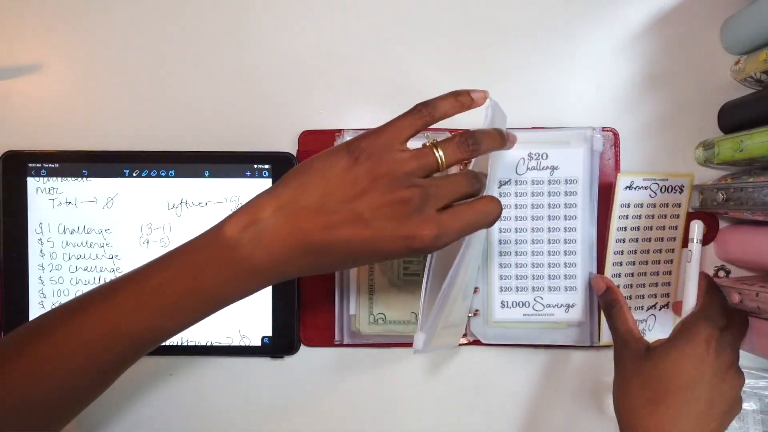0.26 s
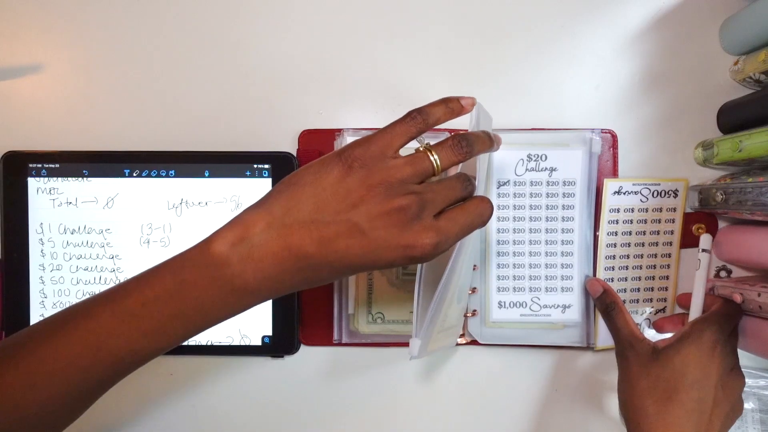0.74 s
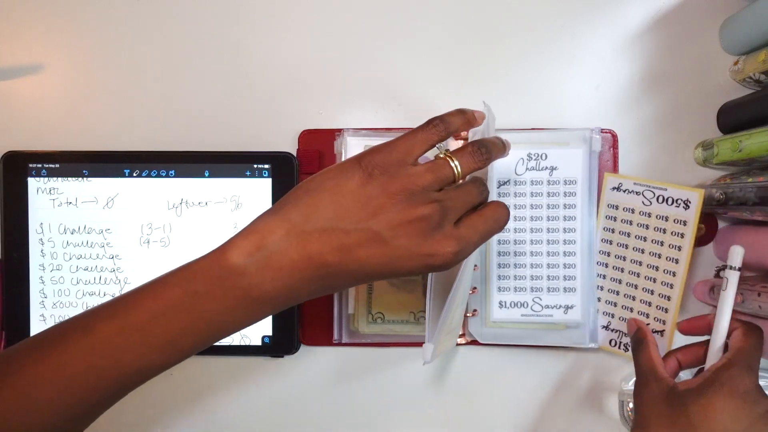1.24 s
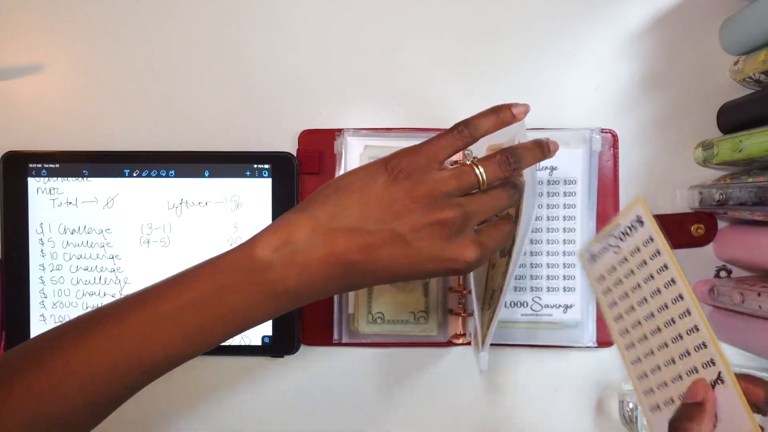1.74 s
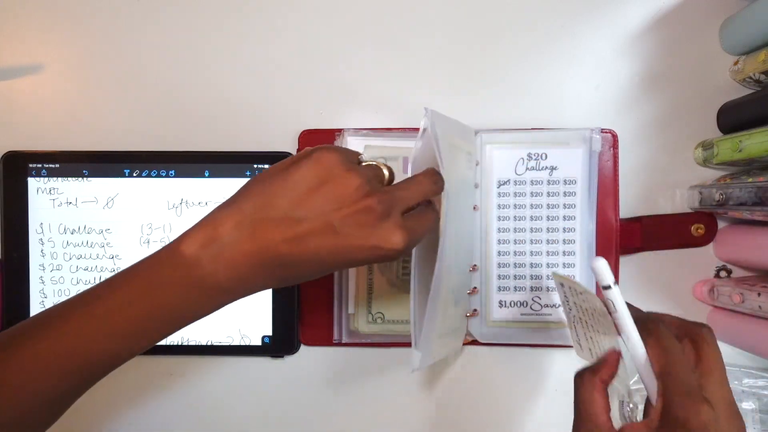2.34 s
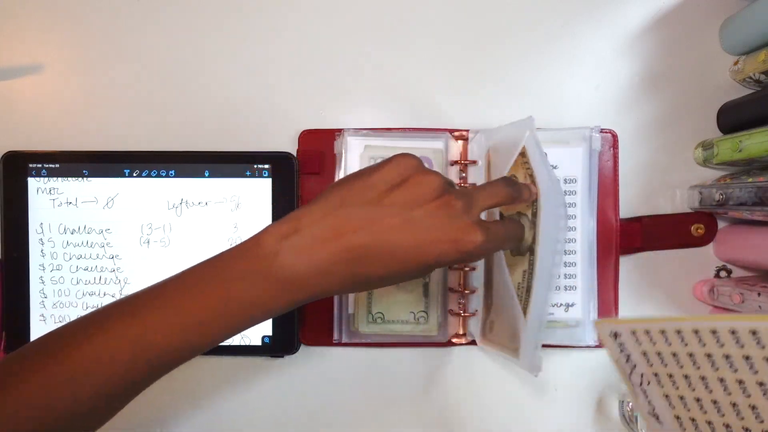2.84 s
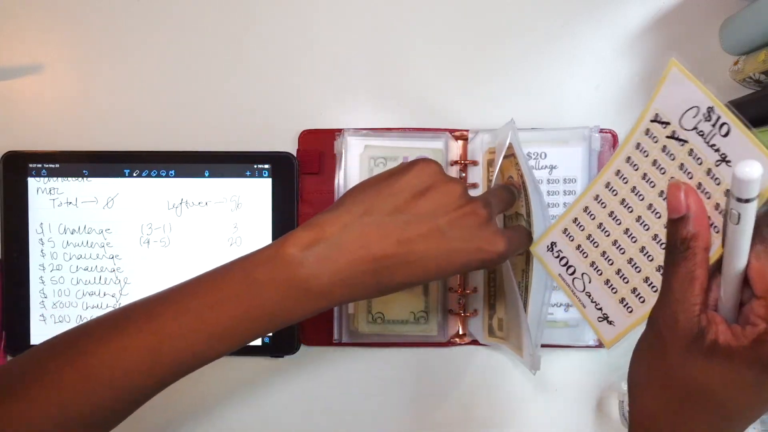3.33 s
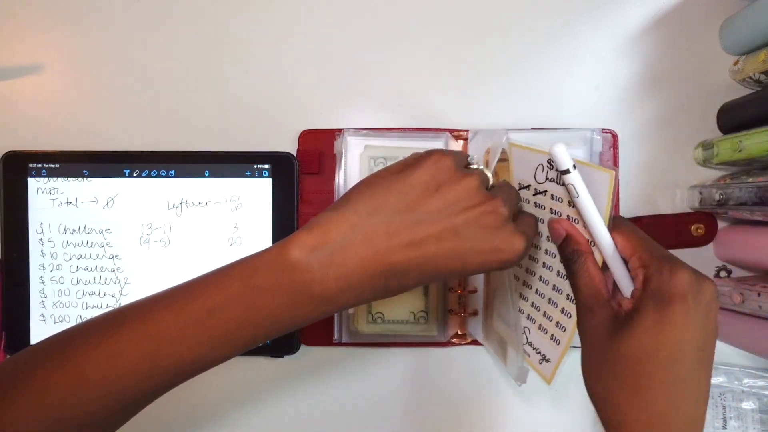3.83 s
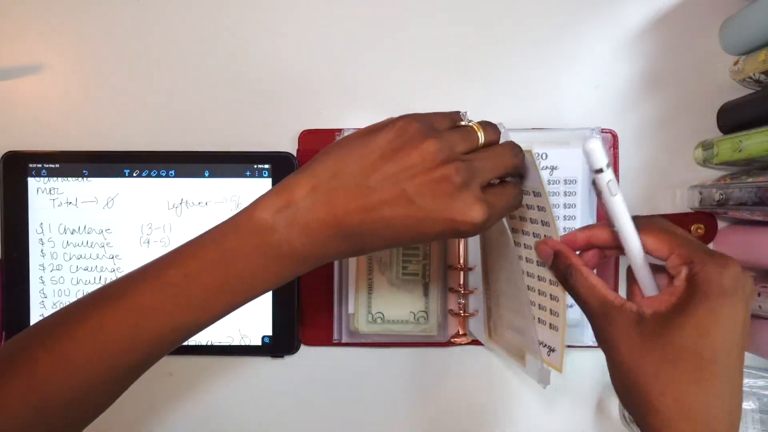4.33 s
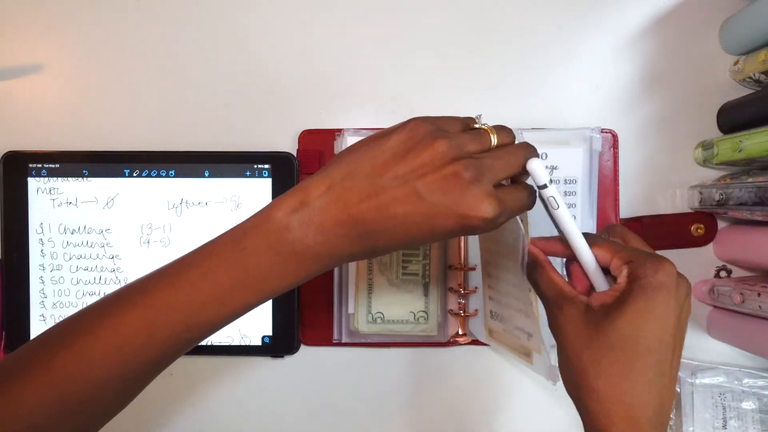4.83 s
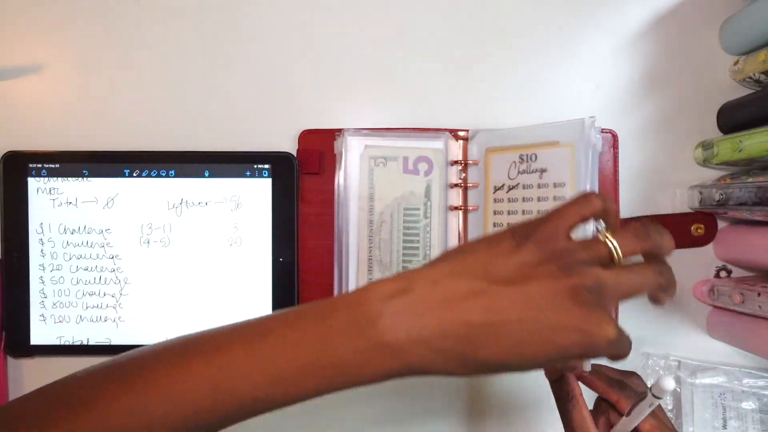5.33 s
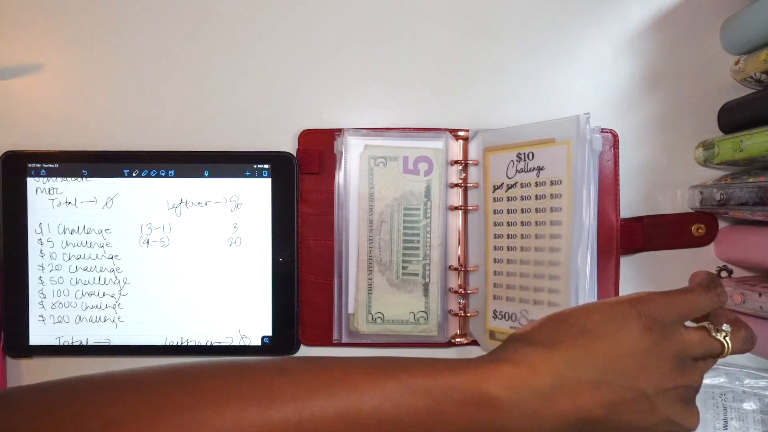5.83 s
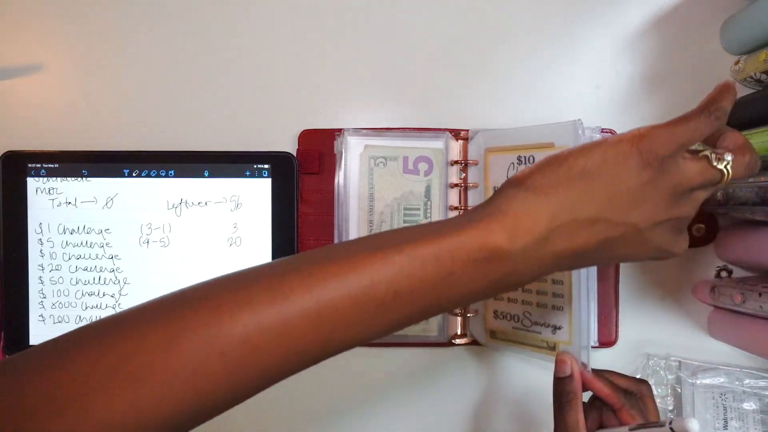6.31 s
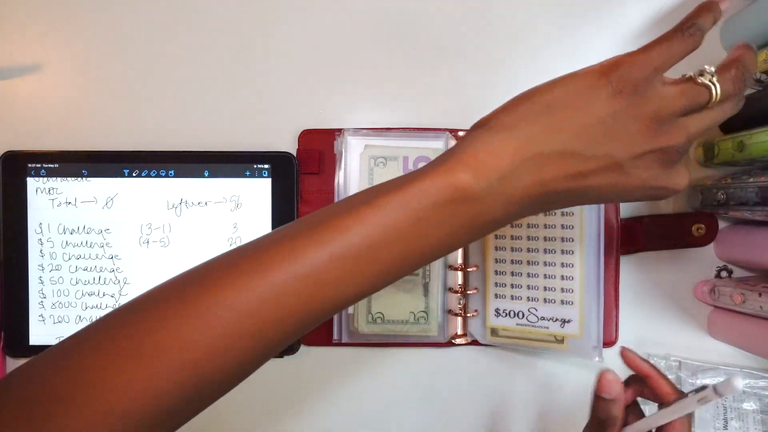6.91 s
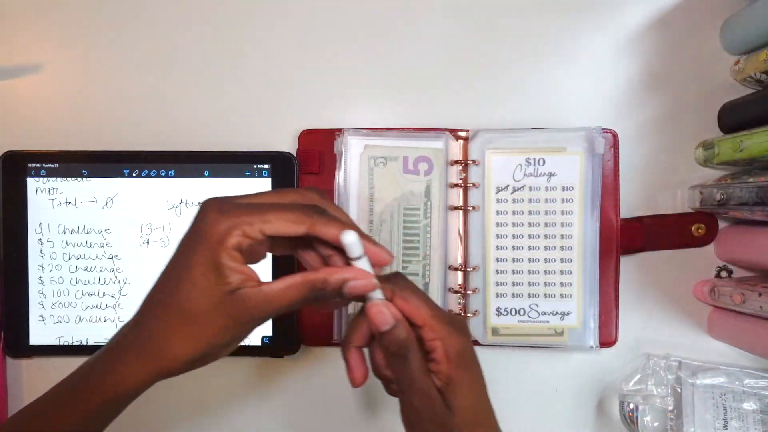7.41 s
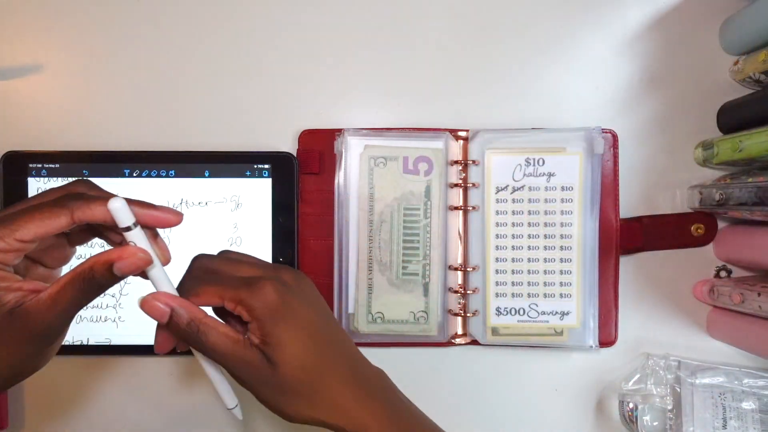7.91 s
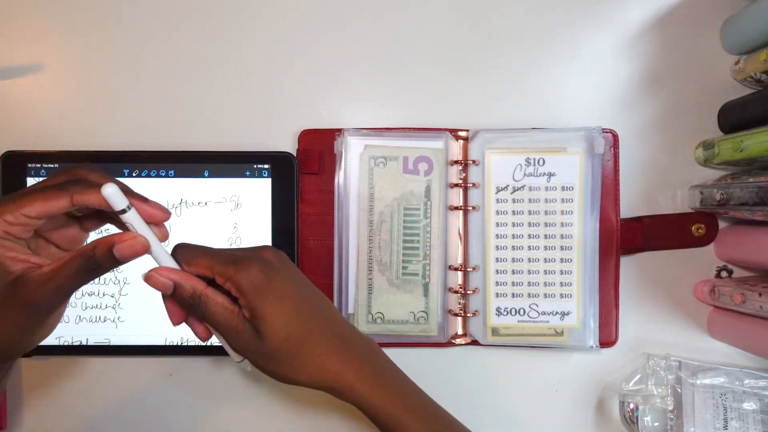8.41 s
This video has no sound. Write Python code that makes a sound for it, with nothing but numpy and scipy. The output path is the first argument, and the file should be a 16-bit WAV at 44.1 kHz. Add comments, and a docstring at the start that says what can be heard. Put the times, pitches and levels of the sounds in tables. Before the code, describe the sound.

Hands rub a stiff paper card against a thin plastic pocket in a small room. Light crackles and soft bumps come first in uneven bursts, then a loud sharp crinkle just before four seconds as the card goes in, more rustling, and near quiet with a few faint clicks and hollow plops. Close stereo microphone, slightly right, over faint hiss and whirr.

```python
"""A fine crackling hiss of paper rubbing on plastic comes first, over a faint steady whirr.
A stiff card is slid into a clear plastic pocket of a cash binder, at a table in a small room.
Random slips through a moving colour make the rubbing; sharp pulses that ring make the buckling snaps.
Hands bump the binder, which rings in low modes, and gliding tone bursts make a few soft hollow plops.
Sparse random echoes make the room's brief answer; filtered noise makes its hiss and whirr."""
import sys
import numpy as np
from scipy import signal
from scipy.fft import rfft, irfft
from scipy.io import wavfile
from scipy.ndimage import uniform_filter1d

SR = 44100
rng = np.random.default_rng(int(sys.argv[2]) if len(sys.argv) > 2 else 0)


def store_wav(level_fs):
    """Save 16-bit WAV to argv[1]."""
    pcm = np.round(np.clip(np.atleast_2d(level_fs), -1, 1) * 32767)
    wavfile.write(sys.argv[1], SR, pcm.T.astype(np.int16))


N = 381800

# One sheet pushed over another. Each row: time at its fastest in seconds, nominal level in dB,
# swell in seconds, fade in seconds, then body, edge and fizz in dB added to the sheets' voice.
STROKES = [(0.01, -59, .08, 0.059, -7, -3, -9), (0.17, -56, 0.23, 0.29, -1, -2, -2),
           (0.29, -41.5, .03, 0.037, -13, -5, 4), (0.44, -39.5, 0.088, .045, -7, -4, -3),
           (0.745, -61, 0.069, 0.099, 11, 1.5, 3), (1.075, -52, 0.045, 0.039, -8, -6, -7),
           (1.128, -38.5, 0.037, 0.067, -21, -11, -3.5), (1.26, -54, .14, .08, -6, -6, 0),
           (1.336, -44, .02, 0.038, -7, -15, -9), (1.53, -51, 0.25, 0.18, -6.5, -9.5, -2.5),
           (1.79, -62.5, 0.21, 0.18, -9, -9, 0), (1.98, -61, 0.15, 0.073, 3, 3, 3),
           (2.25, -51.5, 0.13, 0.089, 0.5, -4.5, 0), (2.355, -45, 0.055, 0.065, -7.5, -1.5, 1),
           (2.48, -51, 0.056, .09, -2, -1.5, 2), (2.625, -50, 0.076, .11, -8, -0.5, 6.5),
           (2.79, -62, 0.17, 0.37, 2, -8, 1.5), (3.10, -58, 0.12, 0.049, -1, -5, 6),
           (3.138, -44.5, 0.035, 0.033, -6.5, -10, -12), (3.24, -63, 0.092, 0.091, 5, -9, -6),
           (3.41, -59.5, 0.081, .17, 7, 3, -1), (3.73, -47, .04, .03, -6, -5, -4),
           (3.756, -26.5, 0.021, 0.034, 7, 17.5, 19), (3.81, -46, 0.055, .13, -1, 11, -2),
           (3.948, -36.5, 0.051, 0.059, -6.5, -3.5, -9), (4.06, -59.5, 0.088, 0.091, 3, 5, 12),
           (4.167, -40, 0.068, 0.073, -3.5, 7, 4), (4.272, -41, 0.058, 0.044, -4, -1, 0.5),
           (4.38, -50.5, 0.11, 0.2, 1, 0, -6), (4.50, -42, 0.044, 0.12, -3.5, 14.5, 9.5),
           (4.555, -41, 0.049, 0.038, 7, 5, 8), (4.585, -44.5, 0.018, 0.022, 5, 3, -12),
           (4.715, -53.5, 0.11, 0.11, -6, 2, -1), (4.84, -49.5, 0.062, 0.065, -12, -1, -2.5),
           (4.957, -37.5, 0.052, 0.053, -1.5, 0.5, -1), (5.244, -49, 0.077, 0.058, 5, 3, 4.5),
           (6.15, -67.5, 0.35, 0.31, 8, -5, 3), (6.29, -70, 0.12, 0.12, 9.5, -2.5, 15),
           (6.95, -60.5, 0.059, 0.091, 14, -1, 8), (7.41, -72.5, 0.092, 0.14, -3, 2, 16)]


def amp(db):
    """Decibels to gain."""
    return 10 ** (np.asarray(db) / 20)


def unit(x):
    """Scales to rms 1."""
    return x / np.sqrt(np.mean(x ** 2) + 1e-20)


def read(points, hz):
    """Joins (Hz, value) points on a log-frequency axis."""
    f, value = np.transpose(points)
    return np.interp(np.log(hz + 1), np.log(f + 1), value)


def add(mix, s, sound):
    """Mixes a sound in at s seconds."""
    part = mix[max(round(s * SR), 0):][:len(sound)]
    part += sound[:len(part)]


def sides(lean_db):
    """Left and right gains whose mean is 1, from left minus right in dB."""
    left = amp(np.atleast_1d(lean_db))
    return np.array([left, np.ones_like(left)]) * 2 / (1 + left)


def low_cut(x, hz):
    """Second-order high-pass filter."""
    return signal.sosfilt(signal.butter(2, hz, "high", fs=SR, output="sos"), x)


def room_tone(air_db=-68, whirr_db=4.5):
    """Steady hiss with a faint whirr, as of a small fan, in a few broad resonances."""
    # The hiss. Each row: frequency in Hz, relative level in dB per Hz.
    air = [(40, -39.5), (75, -20.5), (120, -14.5), (200, -12), (450, -4.5), (800, -1), (1300, -1),
           (2500, -3.5), (5000, -10.5), (15500, -17.5)]
    # The whirr's resonances. Each row: frequency in Hz, width in Hz, level in dB before whirr_db,
    # left minus right in dB.
    whirr = [(575, 160, -82.5, -4), (1124, 110, -77.5, 1.5), (1559, 180, -71.5, -9), (1963, 184, -80, 5.5)]
    # Each row: frequency in Hz, left-right likeness from -1 to 1.
    air_likeness = [(150, 0.34), (550, 0.14), (1000, -0.1), (1600, -0.28), (5000, -0.18), (9000, 0.21),
                    (14000, 1)]
    hz = np.fft.rfftfreq(N, 1 / SR)
    power = (amp(air_db) * unit(amp(read(air, hz)))) ** 2
    for centre, width, db, lean in whirr:
        resonance = unit(1 / (1 + ((hz - centre) / width) ** 2) ** 2)
        power = power + (amp(db + whirr_db) * sides(lean) * resonance) ** 2
    left, other = rfft(rng.standard_normal((2, N)))
    same = np.clip(read(air_likeness, hz), -1, 1)
    right = same * left + np.sqrt(1 - same ** 2) * other
    return irfft(np.array([left, right]) * np.sqrt(power), N)


def hands_db(s):
    """Left minus right level of the sheets at time s."""
    # Where the hands work: always right of centre, nearest the middle at about 4.7 s.
    # Each row: time in seconds, left minus right in dB.
    hands = [(0, -5.5), (2.2, -5), (3.2, -6), (3.8, -3.5), (4.3, -3.5), (4.7, -2), (5, -3.5), (7, -3.5)]
    return np.interp(s, *np.transpose(hands))


def two_ways(pair):
    """A sheet radiates a different wave to each side; returns left and right spectra of two signals."""
    # Each row: frequency in Hz, left-right likeness from 0 to 1.
    likeness = [(300, 0.85), (3500, 1), (5800, 0.28), (9000, 0.55), (15000, 0.88)]
    size = pair.shape[1]
    right, other = rfft(pair)
    same = np.clip(read(likeness, np.fft.rfftfreq(size, 1 / SR)), 0, 1)
    left = same * right + np.sqrt(1 - same ** 2) * other
    return np.array([left, right])


def sheet_db(hz, body, edge, fizz):
    """The sheets' spectrum: broad flexing adds body, tight creases add edge and fizz."""
    # Voice of paper and plastic. Each row: frequency in Hz, relative level in dB per Hz.
    voice = [(40, -45), (130, -52), (230, -37), (330, -16), (480, -17), (640, -3), (1000, -6), (1700, -0.5),
             (2900, -2), (4400, -3.5), (5600, -11), (8500, -17.5), (12000, -29), (15500, -39.5)]
    # Centres of body, middle, edge and fizz in Hz.
    regions_hz = [450, 1500, 3800, 9000]
    low, _, high, top = (read(list(zip(regions_hz, region)), hz) for region in np.eye(len(regions_hz)))
    return read(voice, hz) + body * low + edge * high + fizz * top


def stroke_gains(t, drop_db=19.5, roundness=1.35):
    """Each stroke swells to its fastest moment and fades: gains as (strokes, times)."""
    s, db, swell, fade = np.transpose(STROKES)[:4, :, None]
    away = abs(t - s) / np.where(t < s, swell, fade)
    # down by drop_db one swell before or one fade after; roundness 1 is pointed, 2 a bell
    return amp(db - drop_db * away ** roundness)


def stroke_colours(t):
    """Body, edge and fizz at each time, averaged over strokes by their power."""
    power = stroke_gains(t) ** 2 + 1e-20
    return np.transpose(STROKES)[4:] @ (power / power.sum(axis=0))


def pressure(follow=0.95, light_db=-63.0):
    """Gain of the rubbing; follow says how much a layer grows beyond a light touch."""
    # fingers holding the pocket open stir it faintly until they let go
    hold_db, let_go_s, release_db_per_s = -71.5, 5.54, 30.
    t = np.arange(0, N, 32) / SR
    hold = amp(hold_db - release_db_per_s * np.maximum(t - let_go_s, 0))
    gain = np.sqrt(hold ** 2 + np.sum(stroke_gains(t) ** 2, axis=0))
    followed = amp(light_db) * (gain / amp(light_db)) ** follow
    return np.interp(np.arange(N) / SR, t, followed)


def slips(per_s, spread_db):
    """Random tiny slips, most of them small and a few large."""
    sizes = amp(spread_db * np.minimum(rng.exponential(1, N), 3)) * rng.choice([-1, 1], N)
    return unit(sizes * (rng.random(N) < per_s / SR))


def slide(drive, patchy_db=3.0, size=256):
    """Sends slips through the sheets' changing colour; patches of sheet ring up as the contact moves."""
    hz, t, z = signal.stft(drive, SR, nperseg=size, noverlap=size * 3 // 4)
    patches = rng.standard_normal((len(t), len(hz)))
    patches = uniform_filter1d(patches, size=20, axis=0)  # smooth in time
    patches = unit(uniform_filter1d(patches, size=4, axis=1))  # and in frequency
    gain = amp(sheet_db(hz, *stroke_colours(t)[:, :, None]) + patchy_db * patches).T
    gain /= np.sqrt(np.mean(gain ** 2, axis=0))  # colour alone, no change of level
    return signal.istft(z * gain, SR, nperseg=size, noverlap=size * 3 // 4)[1][:, :N]


def rubbing(hiss_db=-2.0, crinkle_db=-7.0, lean_db=1.0):
    """Dense slips of paper fibres hiss; sparser ones in the plastic crinkle."""
    fibres = irfft(two_ways(np.array([slips(per_s=4500, spread_db=3.) for side in "LR"])), N)
    creases = slips(per_s=190, spread_db=7.0)
    hiss = amp(hiss_db) * fibres * pressure()
    crinkle = amp(crinkle_db) * creases * pressure(follow=0.98)
    return slide(hiss + crinkle) * sides(lean_db + hands_db(np.arange(N) / SR))


def causal(db):
    """Spectrum of the tightest one-sided pulse with these gains."""
    cepstrum = irfft(np.log(amp(np.maximum(db, db.max() - 100))))
    half = len(cepstrum) // 2
    cepstrum[1:half] *= 2
    cepstrum[half + 1:] = 0
    return np.exp(rfft(cepstrum))


def snaps(flutter=0.86, ring_db=12.5, ring_width=.13, scuff_s=0.0004, size=2048):
    """A crease flips with one sharp pulse; the freed patch rings and flutters for a few milliseconds."""
    # Sheets buckling. Each row: time in seconds, nominal level in dB over 10 ms, body, edge and fizz
    # in dB added to the sheets' voice, time to settle in seconds, ring of the flipped patch in Hz.
    buckles = [(0.0486, -46, -3, -10, -7, .0013, 4050), (0.1269, -54, 10, 5, 16, .0012, 1680),
               (0.1408, -45, 14, 18, 5, 0.0018, 2950), (0.1891, -52, -6, 0, 5, .0025, 2820),
               (0.2080, -44.5, 19, 14, 9, .0014, 4700), (0.2264, -36.5, -14, -15, -11, 0.0022, 3830),
               (0.2693, -34.5, -7.5, -3, -7.5, 0.0039, 1240), (0.3009, -36.5, 8, 1, 3, 0.00072, 4140),
               (0.3696, -44.5, -11, -8, 12, 0.00068, 5030), (0.4011, -34.5, 12, -4, 1, 0.0014, 4000),
               (0.4498, -41.5, 7, -1, -3, .0065, 2600), (0.46, -39.5, -9, -0.5, 4, 0.0027, 1430),
               (0.7054, -45.5, -6, -2.5, -1.5, 0.0015, 1960), (0.7323, -51, -24, -9, -10, 0.0025, 3370),
               (1.0779, -39.5, -17, 0, 4.5, 0.0047, 1570), (1.1015, -33.5, -25, -11, -1.5, .001, 3900),
               (1.1195, -39.5, -13, 15, -9, 0.0059, 3050), (1.2358, -43, -20, -10, -10, .0015, 1110),
               (1.34, -43.5, -11, -2, 0, 0.0027, 9900), (1.3879, -48.5, -5, -5, -5, 0.0052, 2120),
               (1.4948, -35, -5.5, -6.5, -3, 0.0016, 1360), (1.5352, -46.5, 8, 1, 7, 0.0048, 1310),
               (1.622, -55.5, -1, -9, -1, .0036, 1580), (1.7116, -55, 12, -2, -11, 0.002, 1600),
               (1.8796, -56, -20, -10, -10, .0054, 1040), (1.9523, -51.5, -3, -7, -3, 0.0028, 2680),
               (2.1405, -46, -19, 1, 2, 0.013, 1610), (2.1858, -43, -8, 2.5, -8, 0.0013, 1340),
               (2.2191, -44, 5, 4, 4, 0.0035, 1960), (2.3865, -44, -9, -3.5, 10.5, 0.0023, 2900),
               (2.4357, -45, -11, -2, 0.5, 0.0061, 980), (2.548, -46, -12, -5, -3.5, 0.0077, 1020),
               (2.822, -46, -15, 2, 8.5, 0.0033, 1480), (3.1168, -35, -3, 3, -8, 0.0027, 1770),
               (3.1207, -36, 6.5, 4, 4, 0.0017, 1780), (3.3962, -48, -2, -11, -0.5, .0028, 3300),
               (3.4015, -38, 0, -3.5, 3.5, .0045, 3230), (3.5754, -47.5, -2, -2, -1, 0.0031, 2070),
               (3.7438, -29, -20, 2, 1, 0.0015, 2150), (3.7574, -24.5, -24, 3, 9, 0.0097, 1890),
               (3.7772, -36, 7, -1, -3, .001, 3990), (3.791, -31, -6.5, -1, -9, 0.002, 5030),
               (3.7977, -34, 6, 1.5, -13, 0.0023, 4600), (3.895, -24.5, 3, 4.5, 4.5, 0.0021, 2170),
               (3.9135, -31, -14, -7, -4, 0.0081, 2500), (4.2664, -38, 3, -2, -1, 0.0034, 2100),
               (4.2807, -42, 25, 15, 22.5, 0.0014, 3900), (4.292, -42, 2, 4, -13, .002, 1400),
               (4.3523, -51, -5, 0, 0, .002, 2950), (4.3741, -47.5, 2, -5, 5, 0.0013, 4930),
               (4.6785, -52.5, 13, 20, -1, .0021, 4760), (4.7462, -48, -7, -6, 2.5, 0.0018, 3470),
               (4.8115, -48.5, 12, 5, -1, 0.0054, 1350), (4.8444, -48, 17, 7, -15, 0.0024, 3020),
               (4.941, -43, -6, -1, 3, 0.0015, 5050), (4.957, -35.5, -31, -8.5, -5, 0.0054, 3160),
               (5.019, -48, 9, 4, 3, .0033, 780), (5.19, -52, 16, 10, 9, .0055, 1560),
               (5.2384, -46, 11, 23, 4, 0.0042, 3700), (5.6159, -56, 19, 11, 14, 0.0037, 2820),
               (5.738, -59.5, 4, -10.5, -14, 0.0021, 3370), (6.0148, -57, 9, -9, -11, 0.003, 1140),
               (6.4352, -61, -14.5, 1, -22, .003, 2220), (6.6478, -60.5, 6, -4, 14, 0.0015, 4320),
               (6.8903, -50.5, 10, 0, -0.5, 0.004, 1380), (6.93, -48.5, 5, 4, 3, 0.0052, 1020),
               (7.0154, -39, 3, -3.5, 11, 0.0011, 2240), (7.373, -63.5, 19, -2.5, 19.5, 0.0024, 3660),
               (8.1143, -57, 18.5, 1, 14, 0.0038, 608)]
    lead_in = 32  # samples kept ahead of the pulse
    out, t, hz = np.zeros((2, N)), np.arange(size) / SR, np.fft.rfftfreq(size, 1 / SR)
    for s, db, body, edge, fizz, settle, ring in buckles:
        chance = rng.standard_normal((2, size))
        rise = scuff_s * (settle / 0.0057) ** 2  # slow flips are scuffs, which start softly
        push = chance * np.exp(-t / settle) * (1 - np.exp(-t / rise))
        push *= flutter * np.sqrt(settle * 1000) / np.linalg.norm(push, axis=1, keepdims=True)
        push[0, 0] += np.sign(chance[0, -1])  # the flip itself
        z = two_ways(np.roll(push, lead_in, axis=1))
        z /= np.sqrt(uniform_filter1d(abs(z) ** 2, size=60))  # each flip drives all regions alike
        colour = sheet_db(hz, body, edge, fizz) + ring_db / (1 + ((hz / ring - 1) / ring_width) ** 2)
        snap = irfft(z * causal(colour))
        snap *= amp(db) * np.sqrt(SR / 100) / np.linalg.norm(snap[1])
        snap *= sides(hands_db(s))
        for channel, sound in zip(out, snap):
            add(channel, s - lead_in / SR, sound)
    return out


def bumps(contact_s=0.00047):
    """Soft blows of hand and card build up over the contact time and ring the binder's low modes."""
    # Each row: time in seconds, relative level in dB, dullness as the blow's corner in Hz.
    blows = [(0.402, -44, 597), (0.455, -55, 600), (0.658, -47.5, 130), (1.102, -59, 250),
             (1.236, -60.5, 350), (1.35, -68, 600), (1.534, -58.5, 300), (1.975, -65, 350),
             (2.22, -61, 350), (3.12, -51, 250), (3.56, -54, 120), (6.93, -57, 300)]
    # The binder lying on the table. Each row: mode in Hz, relative level in dB, t60 in seconds.
    binder = [(127, -21.5, 0.082), (196, -14.5, 0.055), (264, -3, 0.052), (324, -2.5, 0.11),
              (373.3, -6.5, 0.37), (450, 3.5, 0.084), (605, 6, 0.084)]
    out, t = np.zeros(N), np.arange(SR // 2) / SR
    for s, db, corner in blows:
        ring = np.zeros(len(t))
        for k, (hz, mode_db, t60) in enumerate(binder):
            mode = amp(mode_db - 60 * t / t60) * np.sin(2 * np.pi * hz * t)
            ring += mode * (-1) ** k / (1 + (hz / corner) ** 2)
        add(out, s, amp(db) * ring * (1 - np.exp(-t / contact_s)))
    return out


def plops(swell_s=0.0059, sag_per_s=2.1):
    """A few cycles of a low tone that swell, sag in pitch and fade."""
    # Each row: time of the peak in seconds, peak in dB, pitch at the peak in Hz.
    pops = [(0.7625, -42, 582), (5.4492, -39.5, 571), (7.786, -48, 540), (8.1195, -41, 574)]
    out, t = np.zeros(N), np.arange(-SR // 25, SR // 25) / SR
    for s, db, hz in pops:
        turns = hz * (t - sag_per_s * t ** 2 / 2)
        add(out, s + t[0], amp(db) * np.cos(2 * np.pi * turns) / np.cosh(2 * t / swell_s))
    return out


def room(x, wet_db, early_db, likeness=0.6, size=256):
    """Bounces off the table and nearby things, then a diffuse tail that dies band by band."""
    # Each row: frequency in Hz, t60 in seconds, relative strength in dB.
    bands = [(250, 0.31, 6.5), (699, 0.44, -0.5), (1500, 0.38, 0.5), (2680, 0.43, -1), (4550, 0.42, -1),
             (6970, 0.47, -0.5), (13170, 0.45, -1.5)]
    t = np.arange(SR * 2 // 3) / SR
    shape = (2, len(t))
    taps = rng.choice([-1., 1.], shape) * (rng.random(shape) < 6000 / SR)
    taps *= np.clip(t / 0.0042 - .4, 0, 1)  # the tail grows in over the first 6 ms
    hz, at, z = signal.stft(taps, SR, nperseg=size)
    band_hz, *columns = np.transpose(bands)
    t60, strength_db = (read(list(zip(band_hz, c)), hz)[:, None] for c in columns)
    tail = signal.istft(z * amp(strength_db - 60 * at / t60), SR, nperseg=size)[1][:, :len(t)]
    early = rng.choice([-1., 1.], shape) * (rng.random(shape) < 2500 / SR)
    early *= (t > .001) * np.exp(-t / 0.0051)
    echo = np.zeros(shape)
    for db, part in [(wet_db, tail), (early_db, early)]:
        echo += amp(db) * part / np.linalg.norm(part, axis=1, keepdims=True)
    echo[0] = likeness * echo[1] + np.sqrt(1 - likeness ** 2) * echo[0]
    return signal.fftconvolve(x[None], echo, axes=1)[:, :N]


def place(x, low_cut_hz=145.0):
    """Thin sheets radiate little bass; the two microphone ports differ in colour and phase."""
    # Colour of the left port. Each row: frequency in Hz, left minus right in dB.
    lean = [(60, -3), (300, 2.5), (1400, -2), (2300, -0.5), (3500, -1), (5800, -8), (8000, -1.5),
            (11000, 0), (15000, 2)]
    # Each row: frequency in Hz, phase in radians by which left leads.
    lead = [(1500, -0.18), (3000, -0.26), (4500, -0.64), (5600, 1), (6800, -1.5), (10000, -0.89),
            (15000, -0.49)]
    hz = np.fft.rfftfreq(N, 1 / SR)
    z = rfft(low_cut(x, low_cut_hz)) * sides(read(lean, hz))
    z[0] *= np.exp(1j * read(lead, hz))
    return irfft(z, N)


def scene():
    """Sheets, bumps and plops in the room, over its steady tone."""
    rub, knocks, pops = rubbing(), bumps(), plops()
    sheets = snaps() + rub
    # the room gathers all directions, so a snap's flutter and ring even out
    all_round = snaps(flutter=.5, ring_db=8.0) + rub
    echo = room(all_round.mean(axis=0), wet_db=-5.5, early_db=-7.0)
    knock_echo = room(knocks, wet_db=-8., early_db=-9., likeness=.85)
    pop_echo = room(pops, wet_db=-14., early_db=-10.)
    return place(sheets + echo) + knocks + knock_echo + pops + pop_echo + room_tone()


def record(dry, low_cut_hz=75., edge_hz=15850):
    """The recorder's low cut and band limit."""
    band_limit = signal.firwin(511, edge_hz, window=("kaiser", 9), fs=SR)
    return signal.oaconvolve(low_cut(dry, low_cut_hz), band_limit[None], "same")


dry = scene()
out = record(dry)
store_wav(out)
```